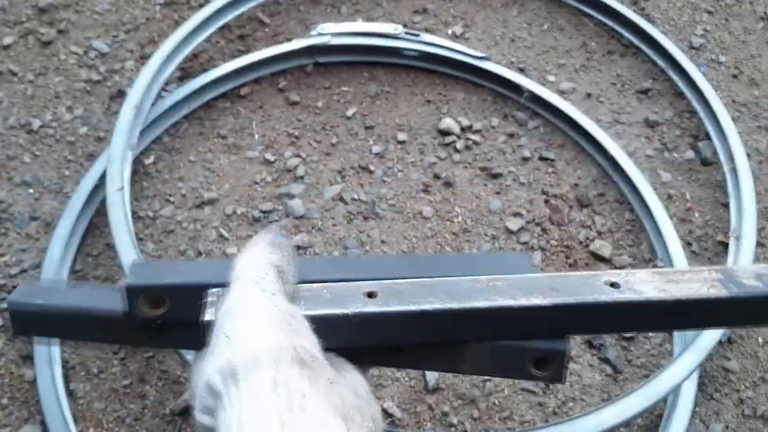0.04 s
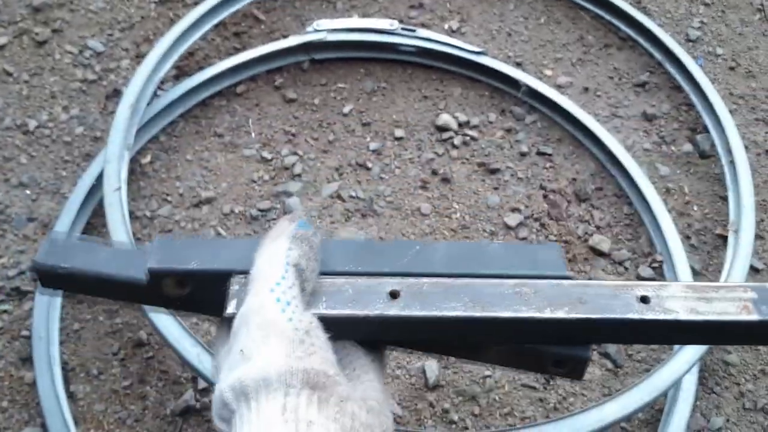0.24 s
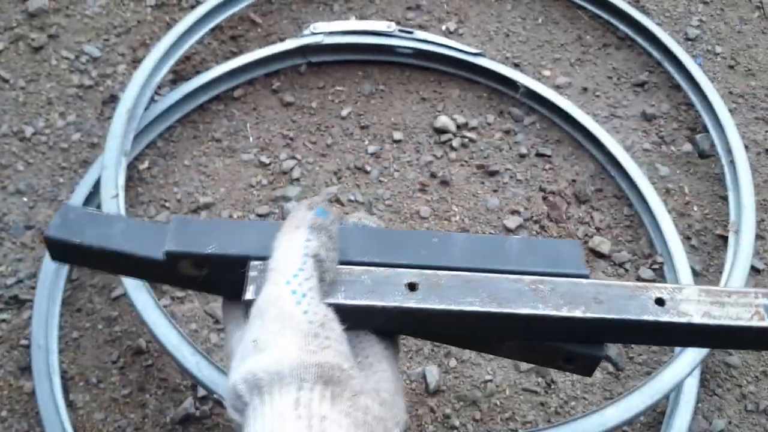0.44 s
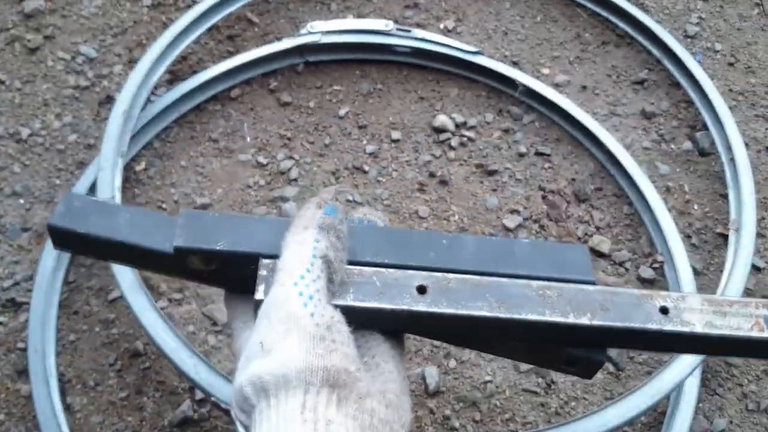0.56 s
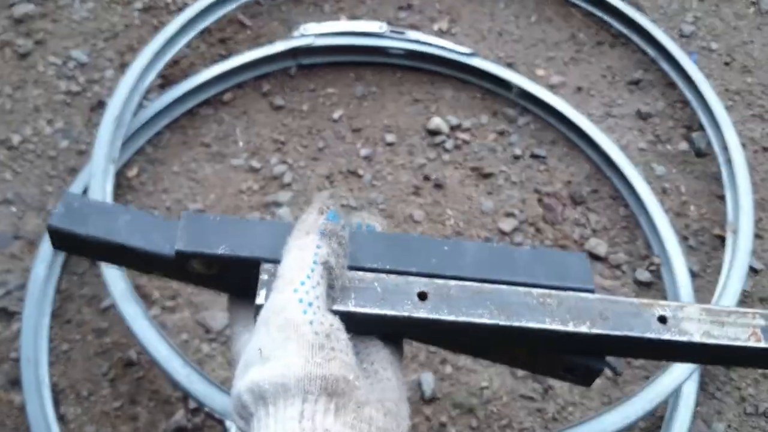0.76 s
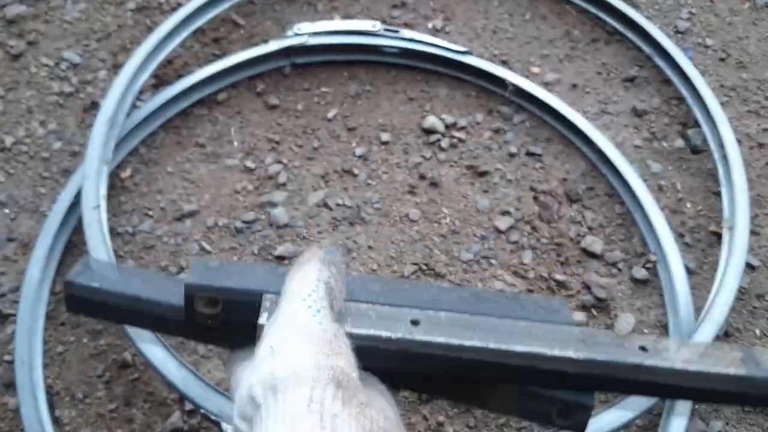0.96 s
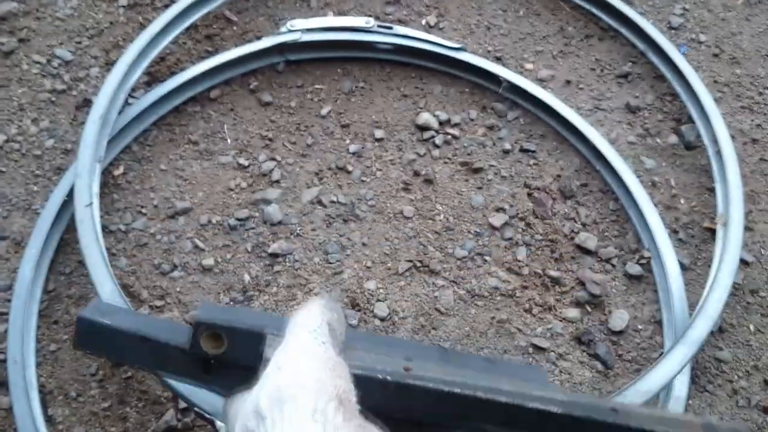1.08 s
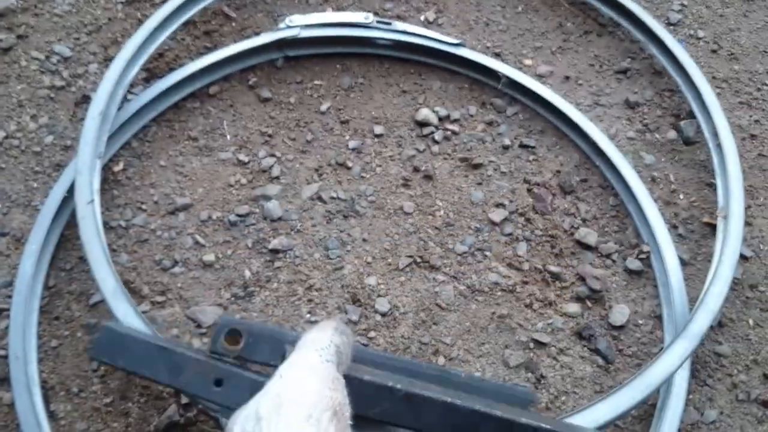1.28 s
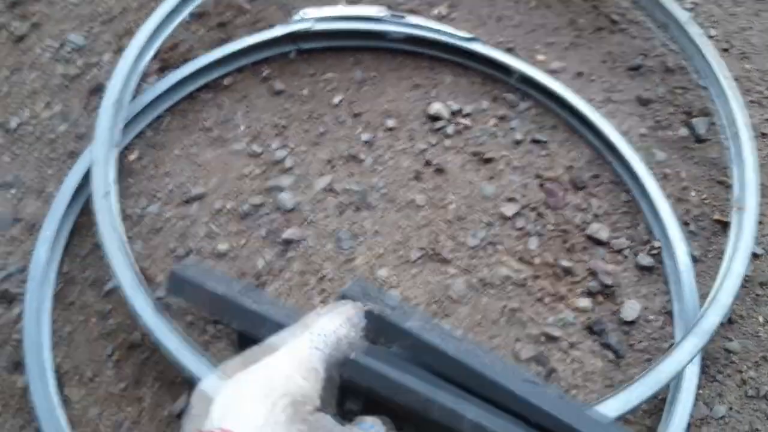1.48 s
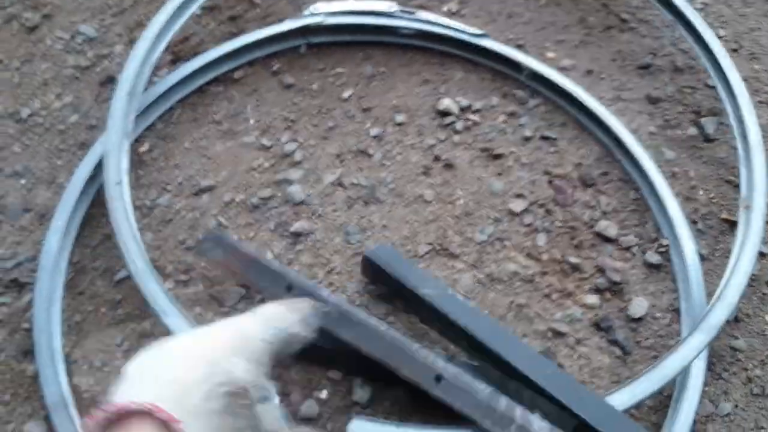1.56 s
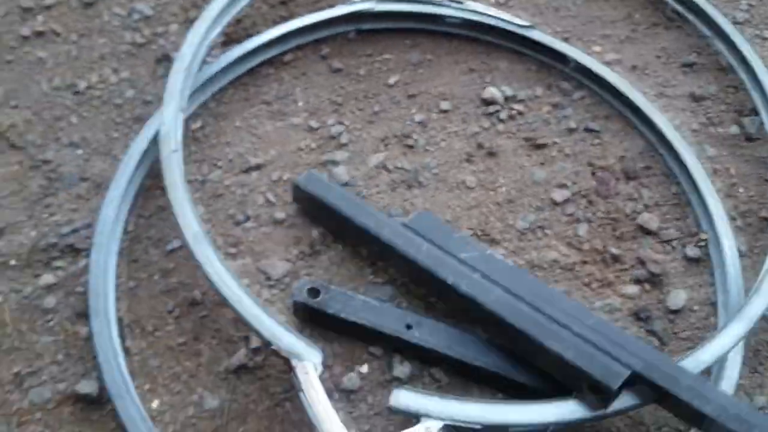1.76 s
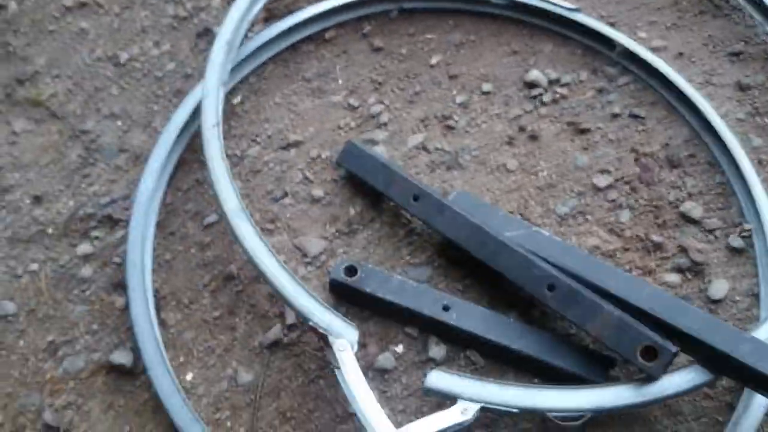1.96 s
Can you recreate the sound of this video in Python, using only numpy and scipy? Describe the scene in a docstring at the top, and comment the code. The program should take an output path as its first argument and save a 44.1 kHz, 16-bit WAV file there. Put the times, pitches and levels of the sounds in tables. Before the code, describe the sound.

A handful of metal tubes clanks and rings as it falls on stony ground

```python
"""Steel tubes dropped on gravel

A gloved hand holds a bundle of square steel tubes that clink faintly, then drops them on gravel and steel hoops.
Blows ring decaying tube modes, crunch the gravel (shaped grains) and thud the ground (band noise).
Beating bends ring between bounces; a faint scrape, finger bumps, light wind and hiss lie under it.
The two ports of a phone colour the sound differently."""
import sys
import numpy as np
from scipy import signal
from scipy.fft import rfft, irfft
from scipy.io import wavfile
from scipy.ndimage import uniform_filter1d

SR = 44100
rng = np.random.default_rng(int(sys.argv[2]) if len(sys.argv) > 2 else 0)


def transcribe(signal):
    """Save signal, clipped to [-1, 1], as a 16-bit WAV file at the path in sys.argv[1]."""
    frames = np.atleast_2d(signal).T
    limited = np.clip(frames, -1, 1)
    pcm = np.round(limited * 32767).astype(np.int16)
    wavfile.write(sys.argv[1], SR, pcm)


N = 89170
PAD = 8942  # samples
HZ = np.maximum(np.fft.rfftfreq(N + PAD, 1 / SR), 1)
T = np.arange(N) / SR
CONTACT_S = 0.00054  # steel stays in touch this long, so each ring starts softly

# Blows of the drop, relative levels: t/s, crunch/dB, thud/dB, long tube/dB, short tube/dB, middle tube/dB,
# low walls/dB, high walls/dB, crunch t60/s, brightness (+ treble, - bass)/dB, crunch build-up/s
BLOWS = [(1.2196, -18, -50.5, -33, -41.5, -62, -44, -50, 0.13, -3, 0.0026),
         (1.245, -8, -38, -19.5, -46.5, -29, -29.5, -50, 0.13, -1.5, 0.002),
         (1.2744, -16.5, -80, -26, -68, -64, -44, -34.5, 0.064, 7.5, 0.0028),
         (1.3345, -72, -67, -71, -52, -80, -47, -74, 0.072, -34, 0.0071),
         (1.3663, -20.5, -79, -58, -44.5, -76, -36.5, -63, 0.11, 0.5, 0.00096),
         (1.419, -20, -36, -59, -36.5, -72, -40.5, -32, 0.036, -1, 0.00097),
         (1.4294, -26.5, -88, -68, -25, -70, -34, -61, 0.38, 3, 0.0088),
         (1.4565, -13, -67, -13.5, -62, -36, -32, -55, 0.11, -2, 0.0019),
         (1.4772, -17, -51.5, -65, -45, -36, -31, -62, 0.18, 1.5, 0.0033),
         (1.4999, -15.5, -49.5, -22, -39.5, -71, -35.5, -33.5, 0.11, -2, 0.00083),
         (1.516, -14.5, -51.5, -18, -53, -23, -62, -57, 0.076, -1.5, 0.0014),
         (1.5495, -13, -50, -44, -43, -29, -33, -33, 0.072, 0, 0.0014),
         (1.5721, -30, -58, -47, -68, -41, -39, -30, 0.13, 8, 0.0068),
         (1.5861, -26.5, -58, -45, -65, -65, -32.5, -46, 0.14, 0, 0.004),
         (1.621, -25.5, -64, -42, -95, -47, -44.5, -63, 0.075, 6, 0.0061),
         (1.6491, -18.5, -53, -28, -49, -67, -36.5, -29, 0.17, 0.5, 0.0017),
         (1.6715, -23, -46, -38, -75, -62, -32.5, -62, 0.42, -1.5, 0.0028),
         (1.6831, -20, -48, -30.5, -64, -42, -61, -28.5, 0.071, 9.5, 0.0037),
         (1.7906, -26.5, -57, -33, -60, -55, -61, -40, 0.1, -2, 0.0048),
         (1.7971, -15, -45, -61, -65, -52, -35.5, -44, 0.11, 3.5, 0.0038),
         (1.8282, -12, -58.5, -28, -62, -42.5, -49, -58, 0.051, -6, 0.021),
         (1.9502, -40.5, -55.5, -38, -84, -62, -93, -88, 0.065, -11, 0.0056)]
# Faint sounds before the drop: clinks in the hand; the row at 0.293 s is a faint rough clink # just before the
# clink at 0.308 s. Relative levels: t/s, rasp/dB, bundle knock/dB, middle tube/dB, # high walls/dB,
# brightness/dB
FAINT_SOUNDS = [(0.0188, -58, -82, -94, -95, -6), (0.1065, -56, -99, -84, -67.5, 0),
                (0.215, -63, -85, -88, -77.5, 3), (0.293, -59, -71, -87, -81, -3),
                (0.3084, -49.5, -54.5, -82, -79, -1), (1.039, -61, -80, -87, -86, -0.5),
                (1.182, -60, -78, -73.5, -75, 0)]


def undb(db):
    """Decibels to amplitude."""
    return 10 ** (np.asarray(db) / 20)


def unit(x):
    """Scale to unit rms."""
    return x / np.sqrt(np.mean(x ** 2))


def over_hz(table):
    """A (Hz, value) table read at every bin, linear in log frequency."""
    hz, value = np.array(table, float).T
    return np.interp(np.log(HZ), np.log(hz), value)


def shape(x, gain):
    """Filter by a gain per bin, padded so that tails do not wrap."""
    return irfft(rfft(x, N + PAD) * gain, N + PAD)[..., :N]


def fade(start_s, t60_s):
    """Zero before the start, then an exponential decay."""
    age_s = np.maximum(T - start_s, 0)
    return (T >= start_s) * 1000. ** (-age_s / max(t60_s, .005))


def swell(start_s, t60_s, build_s):
    """Builds up, then dies away."""
    return fade(start_s, t60_s) * (1 - fade(start_s, 7 * build_s))


def tone(start_s, hz):
    """A sine with zero phase at the start."""
    return np.sin(2 * np.pi * hz * (T - start_s))


def ring(x, hz, t60_s):
    """One mode struck by x; a unit pulse builds up to amplitude near 1."""
    turn = np.exp(2j * np.pi * hz / SR)
    touch = np.exp(-1 / (CONTACT_S * SR))
    decay = np.exp(-np.log(1000) / (t60_s * SR))
    soft = signal.lfilter([1 - touch], [1, -touch * turn], x)
    return signal.lfilter([1], [1, -turn * decay], soft).imag


def grains():
    """Dense clicks of very unequal size."""
    spread_db = 2.5
    return unit(rng.standard_normal(N) * undb(spread_db * rng.exponential(size=N)))


def jangle():
    """Grains through countless narrow rings of loose steel that come and go."""
    ring_depth_db = 6  # rms
    z = signal.stft(grains(), nperseg=1024)[2]
    rings = unit(uniform_filter1d(rng.standard_normal(z.shape), size=5))
    return unit(signal.istft(z * undb(ring_depth_db * rings), nperseg=1024)[1][:N])


def ports(x, other, balance_db, phase_rad, likeness):
    """Balance x over two ports; the left is turned in phase and takes a share of unrelated sound."""
    like = np.clip(over_hz(likeness), 0, 1)
    shared, unshared = np.sqrt(like), np.sqrt(1 - like)
    tilt = undb(over_hz(balance_db) / 2)
    norm = 2 / np.hypot(tilt, 1 / tilt)
    left = shape(x, norm * tilt * np.exp(1j * phase_rad) * shared)
    left = left + shape(other, norm * tilt * unshared)
    right = shape(x, norm / tilt)
    return np.array([left, right])


def contacts():
    """Blows and faint sounds as one table with the columns of BLOWS."""
    off_db, t60_s, build_s = -150, 0.025, 0.0013
    faint = [(s, rasp, knock, off_db, off_db, middle, off_db, high, t60_s, bright, build_s)
             for s, rasp, knock, middle, high, bright in FAINT_SOUNDS]
    return np.array([*BLOWS, *faint], float)


def air():
    """Wind rumble that gusts, over steady hiss: shaped noise, its low part slowly modulated."""
    # Wind and hiss spectrum, relative: f/Hz, density/dB per Hz
    spectrum = [(15, -1.5), (25, -7.5), (59, -22.5), (150, -26), (169, -37), (269, -33.5), (405, -39.5),
                (1850, -50), (3410, -53), (5600, -61), (9190, -53), (16000, -66)]
    # Likeness of the ports: f/Hz, likeness/0-1
    air_likeness = [(60, 0.17), (640, 0.032), (3000, 0.021)]
    # Left minus right: f/Hz, level/dB
    air_balance = [(60, -11), (400, 0), (5000, -1), (15000, 11)]
    level_db, gust_rms_db = -64, 1  # level: rms of the port mean
    a, b = (shape(rng.standard_normal(N), undb(over_hz(spectrum)) * (HZ > 8)) for _ in "ab")
    slow = uniform_filter1d(rng.standard_normal(N), size=3000)
    gust = unit(uniform_filter1d(slow, size=3000))
    low = 1 / (1 + (HZ / 900) ** 2)
    both = ports(a, b, air_balance, 0, air_likeness)
    both = np.array([shape(c, low) * undb(gust_rms_db * gust) + shape(c, 1 - low) for c in both])
    return both * undb(level_db) / np.sqrt(np.mean(both.mean(0) ** 2))


def bumps():
    """Fingers on the phone: low sines that swell and decay."""
    # Finger bumps: t/s, level/dB, f/Hz, t60/s
    finger_bumps = [(0.968, -47.5, 74, 0.07), (1.036, -48, 120, 0.068)]
    build_s = 0.0067
    return sum(undb(db) * swell(s, t60, build_s) * tone(s, hz) for s, db, hz, t60 in finger_bumps)


def scrape():
    """The tubes settle in the glove: grains through one narrow resonance, dying away."""
    center_hz, width_hz, level_db, t60_s = 2470, 250, -81.5, 0.98
    band = 1 / (1 + 1j * (HZ - center_hz ** 2 / HZ) / width_hz)
    rub = unit(shape(np.array([grains(), grains()]), band))
    return undb(level_db) * fade(0, t60_s) * rub


def knocks():
    """The gripped bundle's damped modes swell and die fast at each faint sound, at its knock level."""
    # Gripped bundle's modes: f/Hz, relative level/dB, t60/s
    bundle_modes = [(892, 2, 0.055), (1860, -8, 0.037), (4450, -17, .045), (5400, -12, 0.058)]
    out = np.zeros(N)
    for s, _, knock_db, *_ in FAINT_SOUNDS:
        for hz, mode_db, t60 in bundle_modes:
            out += undb(knock_db + mode_db) * swell(s, t60, CONTACT_S) * tone(s, hz)
    return out


def thuds():
    """Each blow thuds the ground: decaying noise through a broad resonance, two unrelated draws."""
    center_hz, width_hz, t60_s, trim_db = 209, 400, 0.078, -5
    env = sum(undb(blow[2] + trim_db) * fade(blow[0], t60_s) for blow in BLOWS)
    band = (1 / (1 + 1j * (HZ - center_hz ** 2 / HZ) / width_hz)) ** 2
    band = band / np.sqrt(np.mean(abs(band) ** 2))
    return shape(env * rng.standard_normal((2, N)), band)


def gravel(hits):
    """Jangling grains: crunch or rasp and faint settling at each row, over the tubes' rub in the glove."""
    # Gravel spectrum, relative, before the bass cut: f/Hz, density/dB per Hz
    spectrum = [(300, -29), (1040, -21.5), (1580, -7.5), (1770, -0.5), (2790, -11.5), (5460, -7),
                (7890, -12), (9980, -8), (12800, -21.5), (15400, -14), (16500, -33)]
    # Tubes rub in the glove: t/s, level/dB
    rub = [(0.0, -85), (0.946, -95.5), (1.215, -72)]
    trim_db, tail_db, tail_t60_s = -11, -23, 0.47
    bass_cut_hz, split_hz = 300, 4500
    low, high = 0, 0
    for s, db, *_, t60, bright, build in hits:
        settling = undb(tail_db) * swell(s, tail_t60_s, build)
        env = undb(db + trim_db) * (swell(s, t60, build) + settling)
        low = np.hypot(low, env * undb(-bright))
        high = np.hypot(high, env * undb(bright))
    slide = undb(np.interp(T, *np.array(rub).T, right=-120))
    low, high = np.hypot(low, slide), np.hypot(high, slide)
    colour = undb(over_hz(spectrum)) * HZ / np.hypot(HZ, bass_cut_hz)
    colour = colour / np.sqrt(np.mean(abs(colour) ** 2))
    treble = 1 / (1 + (split_hz / HZ) ** 4)  # share of power
    return np.array([shape(jangle() * low, colour * np.sqrt(1 - treble))
                     + shape(jangle() * high, colour * np.sqrt(treble)) for _ in "ab"])


def bends():
    """The lowest bends ring freely while the tubes bounce, beat against each other and die once they land."""
    # Lowest bends, close enough to beat: f/Hz, side struck/+-1, free t60/s
    bend_modes = [(1775, -1, .9), (1789, -1, .9), (1811, 1, 1.1)]
    # Bounces that set them ringing: t/s, level of each bend/dB x3, time the gravel damps them/s
    bounces = [(1.221, -45, -40, -29, 1.245), (1.246, -45, -30, -23, 1.295), (1.457, -27, -24, -40, 1.475),
               (1.671, -38, -19, -32, 1.685), (1.515, -33, -26, -26, 1.645)]
    landed_t60_s = 0.15
    out = 0
    for s, *levels_db, lands in bounces:
        damping = np.where(T < lands, 1, fade(lands, landed_t60_s))
        for db, (hz, side, t60) in zip(levels_db, bend_modes):
            out = out + side * undb(db) * damping * swell(s, t60, CONTACT_S) * tone(s, hz)
    return out


def tubes(hits):
    """Each row's pulse and the chatter after it ring the modes of all tubes, as heard from two places."""
    # Modes of each tube or wall group: f/Hz, relative level/dB, t60/s
    long_tube = [(1760, -6.5, 0.027), (2158, -21, 0.35)]
    short_tube = [(3262, -1, .16), (4915, -9, .16), (7111, -6, .17), (9647, -7, .1), (10400, -10, .15),
                  (11960, -7, .14)]
    middle_tube = [(4484, -2, .2), (5308, -6, 0.2), (5390, -4, .16)]
    low_walls = [(5600, -8, .11), (6158, -10, .08), (6870, -6, .16), (7115, -4, .15), (7262, -9, .14),
                 (7345, -9, .12)]
    high_walls = [(8790, -8, .15), (9458, -5, .08), (9655, -2, .13), (10085, -7, .13), (10830, -9, .13),
                  (11236, -11, .15), (14440, -12, .05)]
    scatter_db, chatter_db = 2.5, -8.5  # strike place varies (walls only); re-touching after a blow
    out, at = 0, (hits[:, 0] * SR).astype(int)
    chatter = np.array([grains(), grains()])
    for col, modes in enumerate((long_tube, short_tube, middle_tube, low_walls, high_walls)):
        levels_db = hits[:, 3 + col]
        chatter_env = 0
        for db, hit in zip(levels_db, hits):
            s, t60 = hit[0], hit[8]
            # the root gives chatters of any length like energy
            chatter_env = chatter_env + undb(db + chatter_db) * fade(s, t60) / np.sqrt(t60 * SR / 14)
        shake = chatter * chatter_env
        size = (len(hits), len(modes))
        place_db = rng.standard_normal(size) * scatter_db * (col > 2)
        turn = np.exp(2j * np.pi * rng.random(size))  # random phase at the second place
        for k, (hz, mode_db, t60) in enumerate(modes):
            push = shake.astype(complex)
            phases = np.array([np.ones(len(hits)), turn[:, k]])
            push[:, at] += undb(levels_db + place_db[:, k]) * phases
            out = out + undb(mode_db) * ring(push, hz, t60)
    return out


def scene():
    """Sum the sources, each as the two ports hear it."""
    # Left minus right: f/Hz, level/dB
    balance = [(60, -12), (250, -2), (500, -0.5), (1100, -0.5), (1750, -11.5), (2700, -10), (4900, -5.5),
               (6300, -11), (7300, -6.5), (9400, 12.5), (12000, 6), (15000, 0.5)]
    # Phase of the left port: f/Hz, phase/rad
    phase_table = [(1, 2), (950, -0.02), (1720, -2.5), (3270, -8.5), (4570, -15), (8270, -21.5)]
    # Likeness of the ports for all but the ringing steel and the air: f/Hz, likeness/0-1
    near_likeness = [(60, 0.48), (300, 0.39), (700, 0.64), (3000, 0.13)]
    phase = over_hz(phase_table)
    hits = contacts()
    direct, other = gravel(hits) + thuds() + scrape()
    direct = direct + knocks() + bumps()
    near = ports(direct, other, balance, phase, near_likeness)
    steel = ports(*tubes(hits), balance, phase, [(1, 0.15)])
    bent = ports(bends(), 0 * T, balance, phase, [(1, 0.74)])
    return near + steel + bent + air()


def record(dry):
    """The phone rounds the loudest peaks and cuts the top."""
    ceiling, top_hz = .45, 16000
    rounded = ceiling * np.tanh(dry / ceiling)
    top_cut = signal.ellip(8, .2, 70, top_hz, fs=SR, output="sos")
    return signal.sosfilt(top_cut, rounded)


dry = scene()
out = record(dry)
transcribe(out)
```